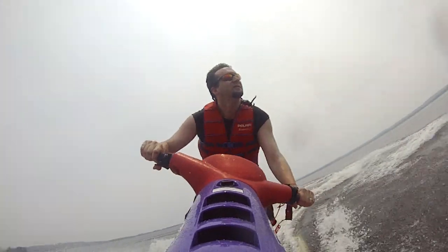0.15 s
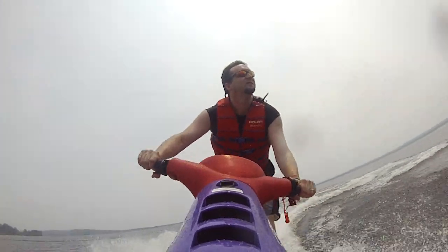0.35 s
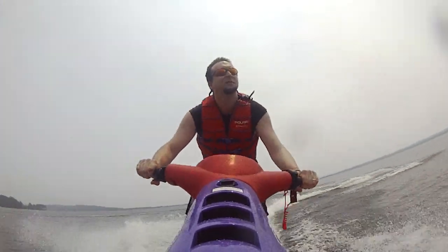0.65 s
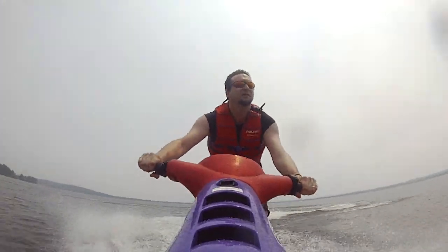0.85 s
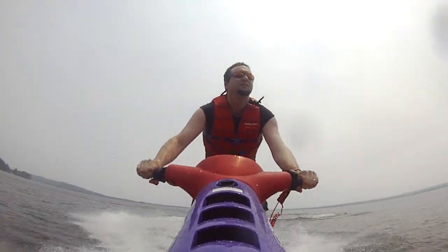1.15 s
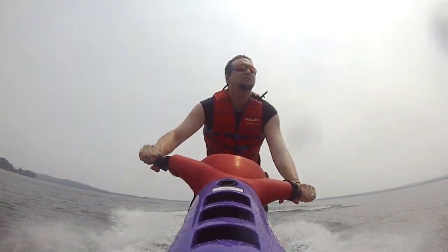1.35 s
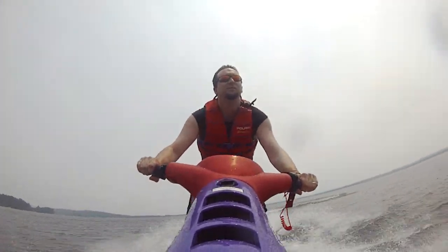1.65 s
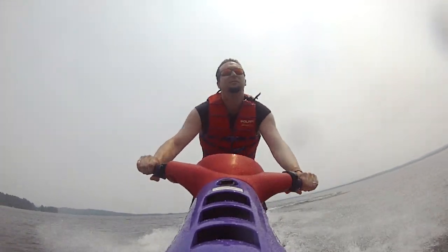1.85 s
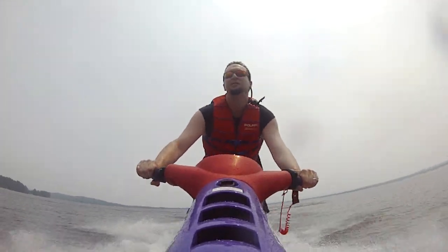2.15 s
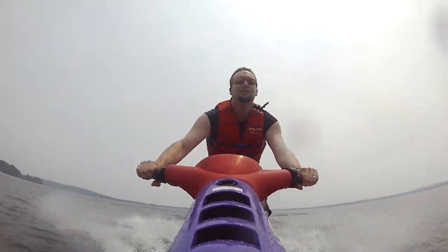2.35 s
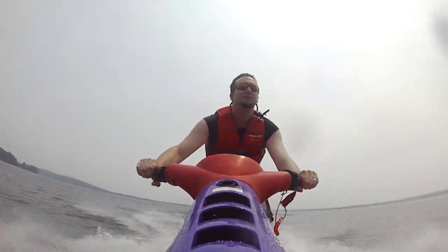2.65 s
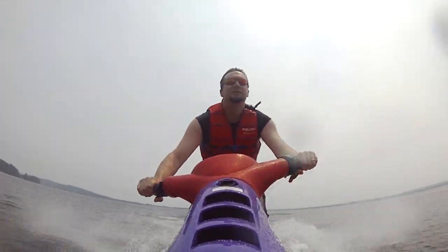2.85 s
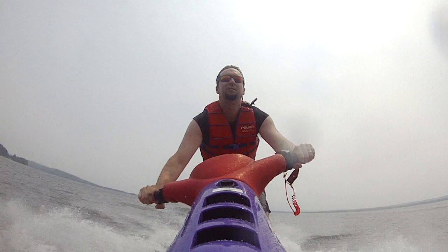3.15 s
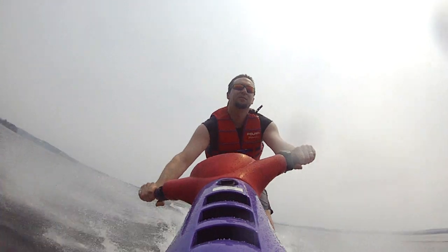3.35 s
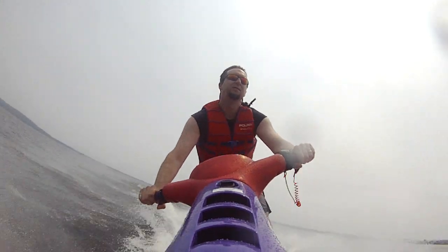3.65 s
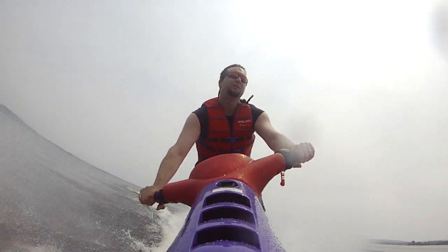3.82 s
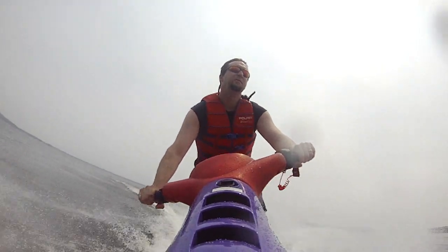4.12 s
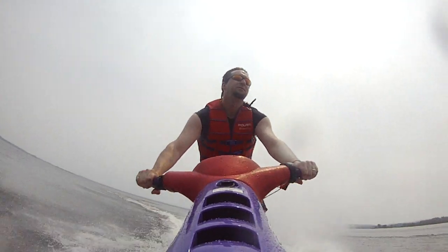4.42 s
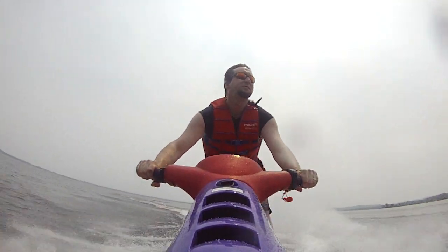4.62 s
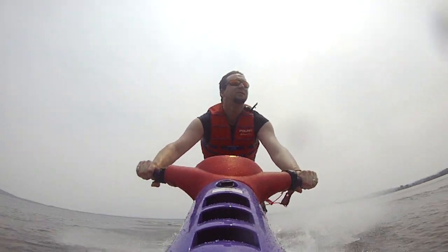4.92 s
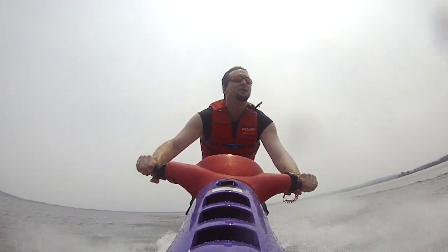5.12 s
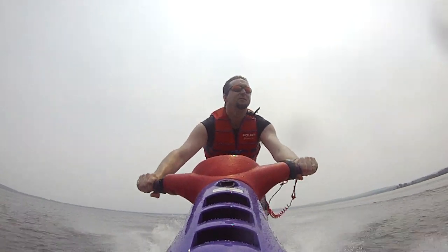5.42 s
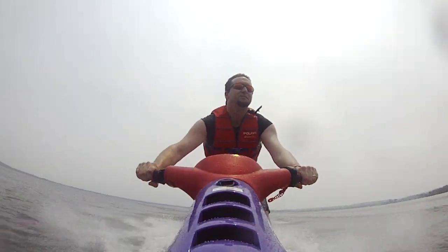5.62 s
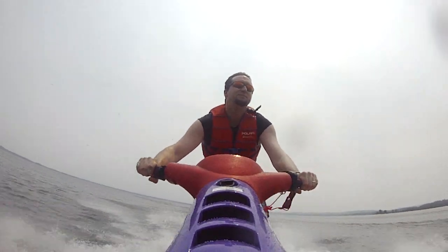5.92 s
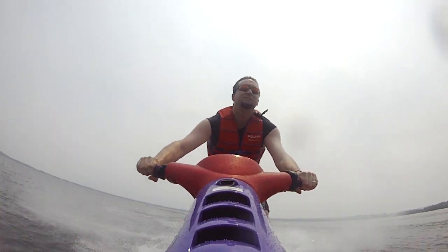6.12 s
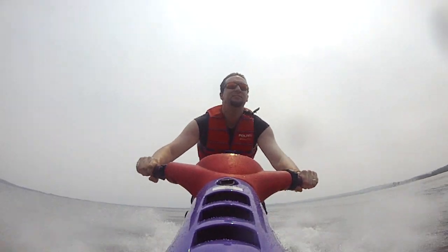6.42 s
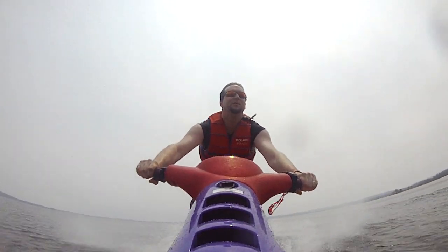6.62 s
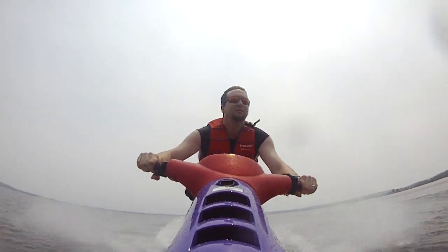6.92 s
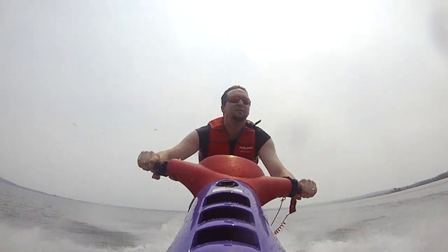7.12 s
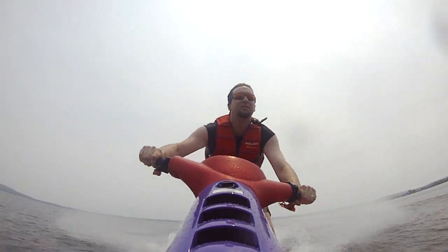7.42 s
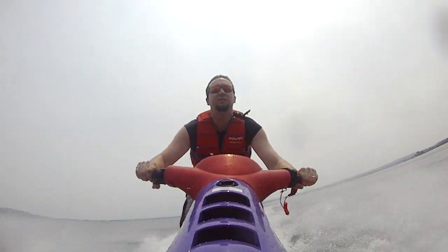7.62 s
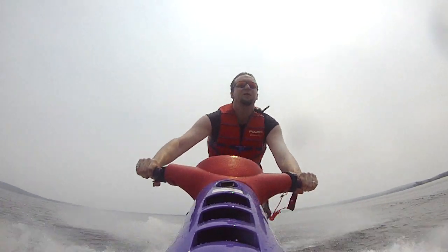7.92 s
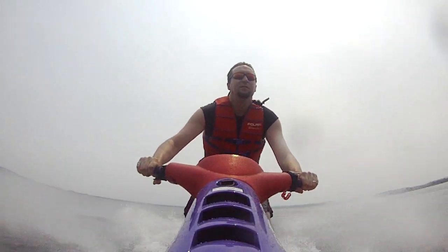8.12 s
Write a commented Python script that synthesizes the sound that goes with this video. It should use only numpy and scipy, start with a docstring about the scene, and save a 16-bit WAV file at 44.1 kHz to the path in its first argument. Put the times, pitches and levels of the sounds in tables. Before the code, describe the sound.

Gusty wind booms over a fast personal watercraft's droning engine, with hissing spray, ticking drops and an early hull thud.

```python
"""A two-stroke watercraft runs fast over open water, heard from a sealed plastic case on the bow. Crank, firing
and pump tones drone through the hull under the bark of the exhaust, and something loose knocks once a turn.
Wind buffets the case, the hull booms in short low notes, spray hisses, and drops tick on its walls. The hull
lands with a thud and later slaps the water once more. Gain control rides the loudest moments."""
import sys
import numpy as np
from scipy import signal
from scipy.fft import rfft, irfft, next_fast_len
from scipy.io import wavfile
from scipy.ndimage import uniform_filter1d

SR = 44100
rng = np.random.default_rng(int(sys.argv[2]) if len(sys.argv) > 2 else 0)


def file_out(sig):
    """Save sig as 16-bit WAV at sys.argv[1]."""
    # one column per channel
    cols = np.atleast_2d(sig).T
    # limit, then scale
    lim = np.clip(cols, -1, 1)
    pcm = np.round(lim * 32767).astype(np.int16)
    wavfile.write(sys.argv[1], SR, pcm)


N = 364707

# the engine's ride: t/s, crank speed/Hz, crank shake/dB, firing/dB, three-blade pump/dB
ENGINE = [(0.0, 86, -54, -49, -36), (0.13, 88.1, -44.5, -35, -31), (0.2, 88.25, -43.5, -41.5, -40),
          (0.35, 88.6, -47, -39, -40), (0.48, 88.26, -45, -45.5, -41), (0.57, 88.54, -48, -38, -34),
          (0.67, 89.7, -54.5, -42.5, -34), (0.75, 93.7, -36, -38, -31.5), (0.84, 94.9, -43, -42, -38),
          (0.92, 95.5, -52, -39.5, -35.5), (1.0, 97, -41, -43.5, -32.5), (1.35, 96.9, -41, -41, -31.5),
          (1.47, 95.33, -40, -40, -33), (1.65, 95.4, -41, -41.5, -29), (1.82, 96.6, -40, -56, -33),
          (1.95, 96, -46.5, -45, -34), (2.2, 95.52, -45, -53, -32.5), (2.4, 92.9, -47, -52, -47),
          (2.58, 92.8, -41, -36, -34), (2.72, 93.1, -45, -54, -36), (2.8, 88.9, -37.5, -55, -54),
          (2.96, 87.2, -49, -41, -45), (3.06, 91.36, -40, -40, -46.5), (3.2, 94.5, -41, -51, -33),
          (3.33, 95.2, -47, -36.5, -40), (3.5, 94.74, -45, -45, -37.5), (3.75, 93.94, -49.5, -53.5, -48.5),
          (4.06, 91.05, -64, -45, -43.5), (4.62, 93, -58, -46.5, -43.5), (4.95, 90, -45, -47, -37.5),
          (5.25, 90.5, -44.5, -45, -44.5), (5.46, 93.37, -43, -37.5, -30), (5.63, 99.7, -45, -37, -37),
          (5.86, 103.6, -51, -53, -45), (6.05, 97.97, -48, -38, -39), (6.3, 99.1, -40.5, -50.5, -33),
          (6.55, 99.6, -47, -35, -38.5), (6.76, 98.05, -37.5, -44.5, -39.5),
          (6.98, 96.6, -51.5, -41.5, -41.5), (7.08, 95.1, -41, -54, -29.5), (7.3, 91.5, -49, -44, -52.5),
          (7.5, 87.8, -42.5, -41.5, -45), (7.75, 89, -48.5, -46.5, -44.5),
          (8.27, 88.45, -47.5, -43.5, -36.5)]
# sheets of spray thrown on the case: t/s, half length/s, rise/dB
SPLASHES = [(2.759, 0.025, 0), (3.353, 0.024, 6), (3.457, 0.027, 1.5), (3.516, 0.016, 4), (4.44, 0.087, 5),
            (6.257, 0.026, 3.5), (6.6, .04, 1), (7.07, 0.063, 4.5), (7.44, 0.022, 2.5), (8.088, 0.037, 5.5),
            (8.2, 0.024, 3)]


def gain_of(db):
    """Decibels to amplitude."""
    return 10 ** (np.asarray(db) / 20)


def unit_rms(x):
    """Scales to rms 1."""
    return x / np.sqrt(np.mean(x ** 2) + 1e-20)


def curves(rows):
    """One automation curve, sample by sample, for each column after the time."""
    s, *rest = np.transpose(rows)
    return [np.interp(np.arange(N) / SR, s, column) for column in rest]


def swells(s, half_s, db):
    """A sum of bell-shaped level moves in dB, one for each event."""
    t = np.arange(0, N + 64, 64) / SR
    bells = db * np.exp(-((t[:, None] - s) / half_s) ** 2)
    return np.interp(np.arange(N) / SR, t, bells.sum(axis=1))


def wander(hz):
    """Random modulation of rms 1, moving up to about hz times a second."""
    steps = np.arange(0, N + 32, 32)
    slow = signal.sosfilt(signal.butter(2, hz, fs=SR / 32, output="sos"), rng.standard_normal(len(steps)))
    return np.interp(np.arange(N), steps, unit_rms(slow))


def noise(spectrum, size, patchy_db, patch_hz, patch_s):
    """Coloured noise of rms 1, mottled with louder and softer patches in time and frequency."""
    hop, hz = size // 4, np.fft.rfftfreq(size, 1 / SR)
    real, imag, patches = rng.standard_normal((N // hop + 5, len(hz), 3)).T
    patches = uniform_filter1d(patches, max(1, round(patch_hz / hz[1])), 0)
    patches = unit_rms(uniform_filter1d(patches, max(1, round(patch_s * SR / hop)), 1))
    f, db = np.transpose(spectrum)
    colour_db = np.interp(np.log(hz + 1), np.log(f + 1), db, left=-120, right=-120)
    frames = (real + 1j * imag) * gain_of(colour_db[:, None] + patchy_db * patches)
    return unit_rms(signal.istft(frames, nperseg=size, noverlap=size - hop)[1][:N])


def split(x, hz):
    """A brick-wall crossover: the parts below and above hz."""
    size = next_fast_len(len(x))
    spectrum = rfft(x, size)
    spectrum[round(hz * size / SR):] = 0
    low = irfft(spectrum, size)[:len(x)]
    return low, x - low


def impulses(hits):
    """One single-sample hit for each (t/s, level/dB)."""
    out = np.zeros(N)
    for s, db in hits:
        out[round(s * SR)] = gain_of(db)
    return out


def ring(modes, contact_s):
    """A struck body's decaying modes, peak 1; longer contact dulls the blow."""
    t = np.arange(2000) / SR
    x = sum(gain_of(db) * np.exp(-np.pi * width * t) * np.sin(2 * np.pi * hz * t)
            for hz, width, db in modes)
    x = np.convolve(x, signal.windows.gaussian(61, contact_s * SR))
    return x / abs(x).max()


def crank():
    """Running count of crankshaft turns, slightly uneven in speed."""
    return np.cumsum(curves(ENGINE)[0] * (1 + 0.0039 * wander(13.4))) / SR


def engine(turns):
    """Crank, pump and exhaust orders as sines; a ringing lag from order to order shapes each bark."""
    # exhaust, open to the air until the hull lands: t/s, order 4/dB, bark/dB, orders 6 and 7/dB
    exhaust = [(0.0, -37, -39.5, -38), (0.07, -34.5, -40.5, -39), (0.14, -36.5, -43, -58),
               (0.22, -36.5, -60, -68), (0.28, -34.5, -47, -44), (0.33, -54, -43, -53),
               (0.4, -41, -47, -48), (0.46, -52, -48.5, -45), (0.52, -42, -42, -46), (0.58, -41, -41, -44),
               (0.7, -39, -40.5, -42), (0.78, -37, -45, -38.5), (0.85, -47.5, -55.5, -55),
               (2.7, -52, -58.5, -59.5), (2.98, -37, -54.5, -56), (3.12, -56, -59, -61),
               (5.2, -50.5, -55, -54.5), (6.0, -50, -52.5, -55), (6.7, -49, -59, -60),
               (7.3, -59, -58.5, -55), (7.7, -35.5, -61, -58), (7.85, -49, -54, -59),
               (8.0, -33.5, -49, -53), (8.27, -60, -60, -60)]
    # overtones of the bark: multiple of crank speed, relative level/dB
    bark_orders = [(5, 5), (8, -7.5), (9, -16), (10, -20), (11, -18.5), (12, -24.5), (13, -26.5),
                   (15, -23.5), (16, -26), (18, -34), (20, -38), (22, -33.5)]
    # orders 6 and 7: multiple of crank speed, relative level/dB
    middle_orders = [(6, -0.5), (7, -8)]
    _, shake_db, firing_db, pump_db = curves(ENGINE)
    fourth_db, bark_db, middle_db = curves(exhaust)
    chop_from_s, lag_rad = 2.2, 0.3
    # in choppy water the pump gulps air and its tone breaks up
    gulp_db = 4.5 * wander(14) * np.clip(np.arange(N) / SR - chop_from_s, 0, 1)
    low_db = [shake_db + 2.2 * wander(12),  # the first two orders flutter as the hull skips
              firing_db + 2.2 * wander(12),
              pump_db + 0.76 * wander(3.2) + gulp_db,
              fourth_db + 1.4 * wander(12)]
    # order, level/dB, phase waver/rad: no two firings ring alike
    orders = [(k + 1, db, 0.27 * wander(21)) for k, db in enumerate(low_db)]
    orders += [(k, bark_db + db + 0.71 * wander(6.2), 0.3 * wander(9.5)) for k, db in bark_orders]
    orders += [(k, middle_db + db + 0.79 * wander(3), 0.3 * wander(13)) for k, db in middle_orders]
    return sum(np.sqrt(2) * gain_of(db) * np.cos(2 * np.pi * k * turns - lag_rad * k ** 2 + waver)
               for k, db, waver in orders)


def airflow():
    """Levels of buffeting and rush in dB: a slow ride, strong gusts and small random ones."""
    # wind on the case: t/s, buffeting/dB, rush/dB
    levels = [(0.0, -39.5, -45.5), (0.15, -40, -43.5), (0.28, -39, -40), (0.48, -43, -42),
              (0.62, -39.5, -38), (0.76, -39, -39.5), (0.87, -38.5, -42), (1.78, -40, -40.5),
              (1.92, -34, -35.5), (2.33, -32.5, -38), (2.42, -46, -40.5), (2.8, -39.5, -40),
              (3.24, -43, -40), (3.38, -31.5, -34), (3.6, -39, -31.5), (3.76, -40.5, -39),
              (3.95, -31.5, -36), (4.35, -31.5, -36), (5.1, -35.5, -32.5), (5.5, -37, -34),
              (5.75, -34.5, -32.5), (6.6, -36.5, -32.5), (6.9, -38, -35), (7.3, -39, -34),
              (8.27, -35, -32.5)]
    # gusts and lulls: t/s, buffeting change/dB, rush change/dB
    gusts = [(0.12, 7, 6.5), (1.42, 0.5, 2.5), (1.71, 5.5, -0.5), (1.95, 2.5, 1.5), (2.12, 3.5, 1.5),
             (2.36, 4, 2), (2.5, 12.5, 3), (2.62, 10, 0.5), (2.75, -4, 6), (3.009, 11.5, 1.5),
             (3.53, 7, 2.5), (3.62, -3.5, -3), (4.11, 4, -1), (4.359, 3, 1.5), (4.849, 3.5, 2.5),
             (5.07, 1.5, 2.5), (5.331, 4, 3), (5.72, 3.5, 1.5), (6.23, 4.5, 4), (6.6, 2, 3.5),
             (7.09, 8, 5.5), (7.37, 3.5, 4.5), (7.42, 9, 4), (7.76, 4, 4), (7.879, 2, 2),
             (7.95, -2.5, -2.5), (8.08, -4, 2), (8.2, 4.5, 1.5)]
    half_s = 0.038
    buffet_db, rush_db = curves(levels)
    s, buffet_change_db, rush_change_db = np.transpose(gusts)
    return (buffet_db + swells(s, half_s, buffet_change_db) + 1.4 * wander(7.4),
            rush_db + swells(s, half_s, rush_change_db) + 0.14 * wander(8.2))


def wind(buffet_db, rush_db, flutter_db):
    """Lumpy pressure on the walls of the case, and the rush of air and water along them."""
    # colour of the buffeting: f/Hz, relative density/dB
    buffet_colour = [(15, -40.5), (30, -20.5), (60, -18.5), (80, -15), (110, -1.5), (160, -2.5), (230, 0),
                     (300, -3), (420, -14)]
    # colour of the rush: f/Hz, relative density/dB
    rush_colour = [(170, -28.5), (240, -11), (300, -0.5), (400, -2), (500, -5.5), (700, -13.5),
                   (1080, -27.5), (2000, -43), (2600, -69)]
    buffeting = noise(buffet_colour, size=2048, patchy_db=1, patch_hz=100, patch_s=0.06)
    rumble, lumps = split(buffeting, hz=107)
    rush = noise(rush_colour, size=1024, patchy_db=1.43, patch_hz=400, patch_s=0.03)
    rest_db = -33.5
    rumble_db = rest_db + 0.32 * (buffet_db - rest_db)  # follows the buffeting only a little
    return (gain_of(rumble_db) * rumble + gain_of(buffet_db) * lumps
            + gain_of(rush_db + 0.22 * flutter_db) * rush)


def spray(surge_db, flutter_db):
    """A fine wash with small drops ticking on the case; large drops strike and break into droplets."""
    # modes of the case: f/Hz, width/Hz, level/dB
    case_modes = [(2440, 570, -2.5), (1310, 1200, 2.5), (600, 3300, -3)]
    # colour of the wash: f/Hz, relative density/dB
    wash_colour = [(530, -30.5), (900, -6), (1690, -13), (1980, -13), (2350, -13.5), (2600, -8.5),
                   (2800, -18), (3050, -21), (3960, -55.5), (6710, -120)]
    # fine spray on the case: t/s, level/dB
    fine_level = [(0.0, -57), (0.57, -59), (0.87, -61.5), (1.5, -61.5), (1.81, -64.5), (3.15, -62),
                  (3.49, -59), (3.7, -61.5), (5.08, -60), (5.7, -59), (6.48, -56), (6.78, -58),
                  (8.27, -59.5)]
    # large drops: t/s, strength/dB
    large_drops = [(1.944, -32), (2.6762, -46), (2.7369, -33), (2.7734, -35), (2.8692, -50), (2.9291, -48),
                   (2.997, -33), (3.1067, -34), (3.1597, -37), (3.1709, -37.5), (3.335, -37), (3.34, -42),
                   (3.3466, -39), (3.3626, -35), (3.3921, -44), (3.412, -45), (3.447, -32), (3.469, -36),
                   (3.5025, -26), (3.5155, -31), (3.525, -43), (3.5731, -44), (3.6544, -34), (3.955, -35),
                   (4.1081, -29.5), (4.446, -35), (5.203, -36), (6.235, -50), (6.2505, -29), (6.4998, -32),
                   (6.5584, -34), (6.637, -33), (6.656, -29), (6.871, -35), (6.937, -33), (6.995, -23),
                   (7.189, -31), (7.303, -22.5), (7.383, -31), (7.4364, -30.5), (7.502, -34), (7.6847, -34),
                   (7.767, -30), (8.0687, -42), (8.1844, -28), (8.198, -26), (8.217, -36)]
    wall_hz, drops_per_s = 2950, 300
    wall = signal.butter(7, wall_hz, fs=SR, output="sos")  # the wall muffles each blow
    tick = signal.sosfilt(wall, ring(case_modes, contact_s=0.00005))
    small = gain_of(1.2 * np.minimum(rng.exponential(1, N), 5)) * (rng.random(N) < drops_per_s / SR)
    patter = unit_rms(signal.oaconvolve(small * rng.choice([-1, 1], N), tick)[:N])
    wash = noise(wash_colour, size=512, patchy_db=1.5, patch_hz=1412, patch_s=0.012)
    fine_db = curves(fine_level)[0] + swells(*np.transpose(SPLASHES)) + 0.4 * surge_db + 0.74 * flutter_db
    fine = gain_of(fine_db) * (gain_of(-1.75) * wash + gain_of(-1.5) * patter)
    large = impulses(large_drops)
    strikes = signal.oaconvolve(large, tick)[:N]
    t = np.arange(3000) / SR
    droplets = wash * signal.oaconvolve(large, np.exp(-t / 0.005) - np.exp(-t / 0.0011))[:N]
    return fine + gain_of(-2.5) * strikes + gain_of(-18) * droplets


def sheen_flicker():
    """Level of the top band against the hiss in dB: it flickers and now and then dips."""
    # trim of the top band: t/s, level/dB
    trim = [(0.0, -13), (0.4, -13), (1.0, -13), (3.4, -14.5), (4.0, -19.5), (4.7, -17.5), (8.0, -17.5)]
    # brief dips: t/s, length/s
    dips = [(1.27, .1), (2.09, 0.054), (2.65, .12), (3.13, 0.049), (3.28, 0.057), (3.76, 0.058),
            (4.54, 0.14), (5.44, .04), (6.04, .04), (7.22, 0.14)]
    s, length_s = np.transpose(dips)
    return curves(trim)[0] + swells(s, length_s / 2, db=-8.5) + wander(6)


def knocking(turns):
    """Something loose knocks once a turn: a short lift of the hiss, in dB."""
    # spells of harder knocking: t/s, half length/s, rise/dB
    spells = [(.14, .03, 6), (0.37, .015, 8), (.425, .012, 3), (0.558, 0.035, 2.5), (0.698, .04, 6),
              (.99, .02, 7), (1.085, .025, 3.5), (1.16, .035, 5), (1.39, .04, 4), (1.474, 0.029, 6.5),
              (2.797, .04, 5), (3.0, .03, 6), (3.071, .04, 6), (3.22, 0.029, 7)]
    width_turns = 0.1
    force_db = 5 * np.clip(wander(8) + 0.5, 0, 1.5) + swells(*np.transpose(spells))
    return force_db * np.exp(-((turns % 1 - 0.5) / width_turns) ** 2)


def rattling_hiss(turns, surge_db, flutter_db):
    """Treble hiss shaken by each firing and knock, lifted by surges and splashes, with a sheen on top."""
    # ride of the hiss: t/s, level/dB
    hiss_level = [(0.0, -68.5), (0.15, -67), (0.3, -66.5), (0.48, -70), (0.6, -71), (0.75, -69.5),
                  (0.9, -76), (1.5, -74), (1.7, -76), (2.3, -76), (2.5, -73.5), (2.68, -77), (2.8, -73),
                  (3.3, -74.5), (3.38, -72), (3.58, -71), (3.76, -72.5), (3.9, -70), (5.39, -70),
                  (5.55, -71.5), (5.76, -68.5), (6.0, -70.5), (6.62, -69.5), (6.86, -73.5), (7.07, -71),
                  (7.21, -73), (7.45, -69), (7.85, -71.5), (8.15, -70)]
    # colour of the hiss: f/Hz, relative density/dB
    hiss_colour = [(2900, -8.5), (3300, -2.5), (3800, -4.5), (4200, -2.5), (4650, 1.5), (5150, -1.5),
                   (5500, -6), (6100, -5), (6700, -11.5), (7300, -20), (8200, -24.5), (9500, -25),
                   (11000, -40.5)]
    # colour of the top band: f/Hz, relative density/dB
    sheen_colour = [(7000, -29.5), (8000, -13.5), (9800, -9), (10300, -1), (10800, 3.5), (11300, -1.5),
                    (11800, -8), (12700, -6.5), (13000, -3), (14500, -6.5), (15200, -9.5), (15600, -39)]
    hiss_db = curves(hiss_level)[0] + 0.26 * wander(6.6)
    hiss_db += 0.5 * surge_db + 0.4 * swells(*np.transpose(SPLASHES))
    sheen_db = hiss_db + sheen_flicker()
    knock_db = knocking(turns)
    pulse_db = 0.39 * np.cos(4 * np.pi * turns) + 0.45 * flutter_db + knock_db
    dull, keen = split(noise(hiss_colour, size=256, patchy_db=1.05, patch_hz=2950, patch_s=0.02), hz=5450)
    hiss = gain_of(-0.7 * knock_db) * dull + keen  # keeps the knocks mostly in the upper band
    top = noise(sheen_colour, size=256, patchy_db=2.5, patch_hz=3140, patch_s=0.012)
    sheen, air = split(top, hz=12850)
    landed_s = 0.82  # the very top fades once the hull has landed
    air_db = -22 * np.clip((np.arange(N) / SR - landed_s) * 20, 0, 1)
    shimmer = gain_of(sheen_db + 0.29 * pulse_db) * (sheen + gain_of(air_db) * air)
    return gain_of(pulse_db) * (gain_of(hiss_db) * hiss + shimmer)


def mist():
    """A thin bright hiss of mist in the opening moments, gone before the first second ends."""
    # colour of the mist: f/Hz, relative density/dB
    colour = [(6500, -13), (7300, -2), (9500, -2), (12000, -4.5), (15000, -5)]
    # fade of the mist: t/s, level/dB
    fade = [(0.0, -82), (0.35, -83), (0.5, -90), (0.75, -88), (0.9, -120)]
    return gain_of(curves(fade)[0]) * noise(colour, size=256, patchy_db=0.5, patch_hz=3035, patch_s=0.015)


def hull_slaps():
    """The hull rings as it lands, rebounds and later slaps the water again."""
    # modes of the hull: f/Hz, width/Hz, level/dB
    hull_modes = [(235, 40, -1), (350, 40, 0), (110, 70, -26), (1100, 600, -15), (3100, 800, -24)]
    # slaps and a soft rebound: t/s, peak/dB, contact/s
    slaps = [(.8164, -15, .00006), (.8248, -27, .0003), (3.4726, -19, .0003)]
    out = np.zeros(N)
    for s, db, contact_s in slaps:
        thud = gain_of(db) * ring(hull_modes, contact_s)
        out[round(s * SR):][:len(thud)] += thud
    return out


def hull_booms():
    """Short low notes booming from the hull, each swelling and fading."""
    # booms: t/s, f/Hz, half length/s, level/dB
    booms = [(1.081, 148, 0.018, -31), (1.9, 131, 0.032, -45), (3.62, 122, 0.038, -32.5),
             (3.962, 166.4, 0.023, -30.5), (4.104, 300, 0.034, -29), (4.29, 189.4, 0.043, -30.5),
             (4.389, 165, 0.03, -34), (4.638, 289.8, 0.045, -31), (6.65, 129.6, 0.042, -40),
             (7.42, 223, 0.022, -31), (7.901, 168.8, 0.021, -34)]
    out = np.zeros(N)
    for s, hz, half_s, db in booms:
        t = np.arange(-3 * half_s, 3 * half_s, 1 / SR)
        start = round((s + t[0]) * SR)
        envelope = np.sqrt(2) * gain_of(db) * np.exp(-(t / half_s) ** 2)
        out[start:start + len(t)] += envelope * np.sin(2 * np.pi * (hz * t + rng.random()))
    return out


def drop_ping():
    """One drop lands with a short clear ring."""
    at_s, peak_db, hz, width_hz = 2.0205, -39, 2698, 99
    ping = ring([(hz, width_hz, 0)], contact_s=0.000092)
    return signal.oaconvolve(impulses([(at_s, peak_db)]), ping)[:N]


def bright_ticks():
    """Single dry clicks with no bass."""
    # clicks: t/s, strength/dB
    clicks = [(4.9966, -53), (5.456, -50), (7.7646, -48), (7.9405, -60)]
    treble = signal.butter(4, [4500, 12500], "bandpass", fs=SR, output="sos")
    return signal.sosfilt(treble, gain_of(4) * impulses(clicks))


def scene():
    """The mono mix; one flutter of gusts moves wind, spray and hiss together."""
    turns, flutter_db = crank(), wander(47)
    buffet_db, rush_db = airflow()
    surge_db = rush_db - uniform_filter1d(rush_db, SR // 2)  # the rush against its half-second average
    bed = engine(turns) + wind(buffet_db, rush_db, flutter_db)
    hisses = spray(surge_db, flutter_db) + rattling_hiss(turns, surge_db, flutter_db)
    hits = hull_slaps() + hull_booms() + drop_ping() + bright_ticks()
    return (bed + hisses + hits + mist())[None]


def record(dry):
    """Gain control evens out the loudest moments; a steep low-pass trims the top."""
    threshold_db, squeeze_share, release_db_per_s, edge_hz = -26.5, 0.55, 61.5, 15450
    power_db = 10 * np.log10(abs(uniform_filter1d(dry[0] ** 2, 300)) + 1e-12)
    fall_db = np.arange(N) * release_db_per_s / SR
    held_db = np.maximum.accumulate(power_db + fall_db) - fall_db
    over_db = np.maximum(held_db - threshold_db, 0)
    squeezed = dry / gain_of(squeeze_share * uniform_filter1d(over_db, 200))
    return signal.sosfilt(signal.cheby2(16, 60, edge_hz, fs=SR, output="sos"), squeezed)


dry = scene()
out = record(dry)
file_out(out)
```